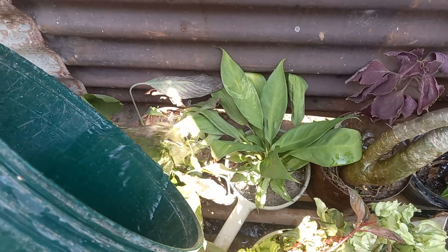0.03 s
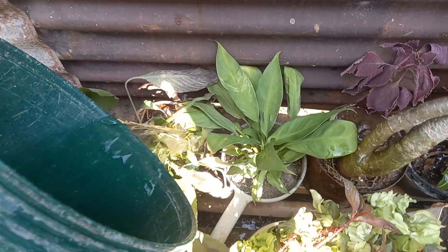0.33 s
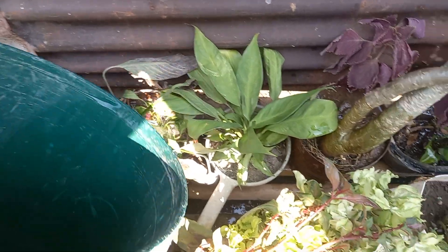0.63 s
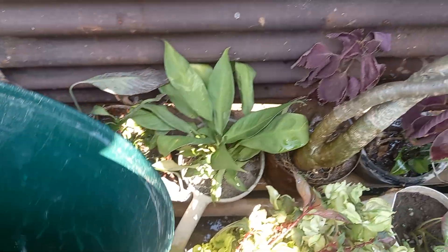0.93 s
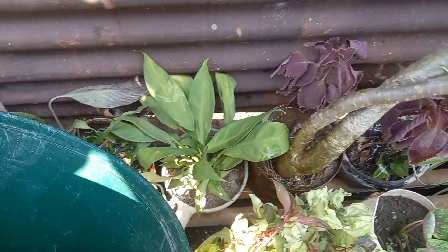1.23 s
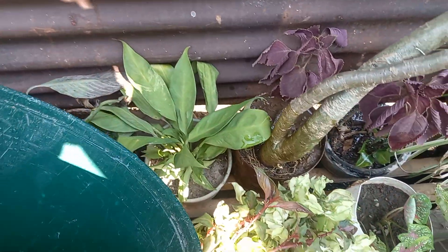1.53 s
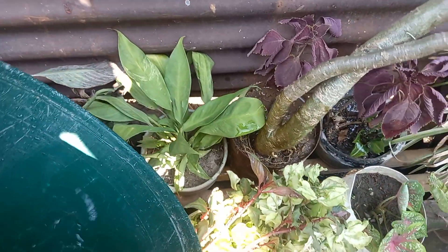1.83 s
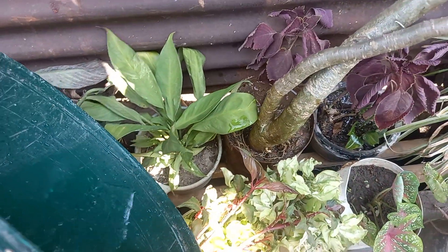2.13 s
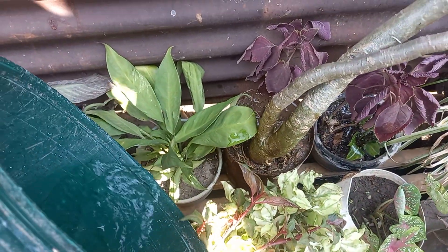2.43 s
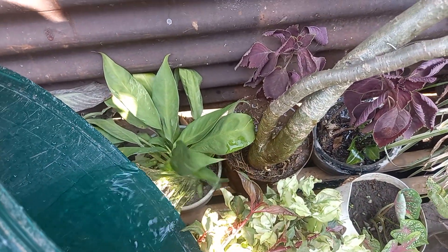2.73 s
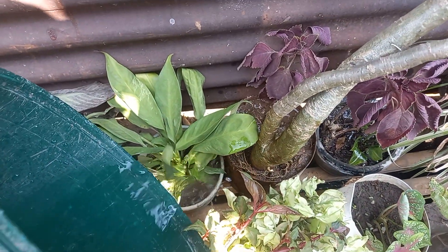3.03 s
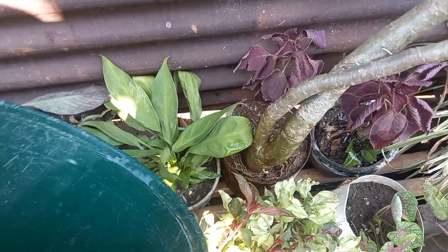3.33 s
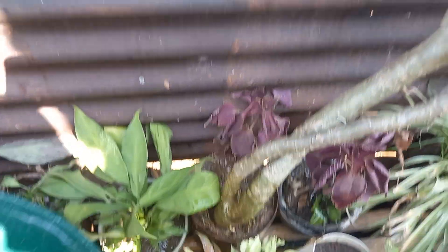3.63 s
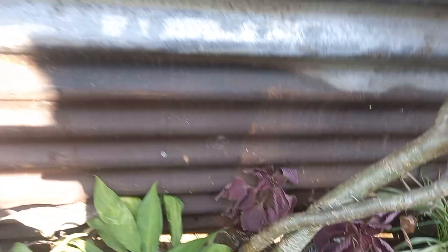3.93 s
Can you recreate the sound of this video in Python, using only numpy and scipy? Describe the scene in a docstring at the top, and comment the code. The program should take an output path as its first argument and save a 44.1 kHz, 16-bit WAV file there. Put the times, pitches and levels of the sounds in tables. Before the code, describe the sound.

Water splatters on leaves and soil in two pours, with drips in between.

```python
"""Water patters onto potted plants, tossed twice from a plastic bucket in a small yard.
Drops hit leaves and soil, bubbles ring in the pots and lumps of water slap down; between the pours
the leaves drip and softly swish close to the microphone. To the left, water shifts in the bucket
and its wall is scraped; near the end it takes a hollow knock and the handle creaks.
A faint low rumble lies under it all."""
import sys
import numpy as np
from scipy import signal
from scipy.fft import rfft, irfft
from scipy.io import wavfile

SR = 44100
rng = np.random.default_rng(int(sys.argv[2]) if len(sys.argv) > 2 else 0)


def materialize(psi):
    """Save the field psi as 16-bit PCM at rate SR to the path in sys.argv[1].

    A 1-D psi becomes a single channel; in a 2-D psi each row is a channel.
    """
    bounded = np.clip(np.atleast_2d(psi).T, -1, 1)
    quanta = np.round(bounded * 32767).astype(np.int16)
    wavfile.write(sys.argv[1], SR, quanta)


N = 176400
TIME = np.arange(N) / SR

# Water landing on the plants: first toss, run-off, second toss. Each row: time in seconds, then
# levels in dB of leaf patter, fine spray and soil splatter, before the trims in pour().
FIRST_POUR = [(0,-48,-57,-71),(.07,-48.5,-54.5,-76),(.105,-52,-49.5,-75),(.125,-46.5,-51.5,-58),(.2,-43,-48,-65.5),(.28,-49,-55,-66),(.39,-44,-46,-58),(.44,-48.5,-51,-59.5),(0.519,-40.5,-43.5,-50),(0.554,-48.5,-50.5,-61.5),(.65,-50,-55.5,-68.5),(.73,-54,-59.5,-67),(.8,-56.5,-63,-67),(.95,-59,-60.5,-75),(1.09,-60,-60,-66.5),(1.16,-71.5,-71,-88)]
RUN_OFF = [(1.25,-72,-69.5,-88),(1.4,-66.5,-67.5,-81),(1.6,-74.5,-72,-78),(1.8,-67,-70,-86.5),(1.98,-79,-77,-91),(2.08,-73,-78,-82),(2.2,-68,-74,-83),(2.38,-61.5,-62,-77.5),(2.5,-68.5,-78,-84),(2.601,-70,-74,-93)]
SECOND_POUR = [(2.659,-62,-61,-89),(2.8,-67,-60.5,-83),(2.86,-54,-55.5,-86),(2.97,-49.5,-50.5,-78),(3.05,-51,-59,-76),(3.1,-58.5,-54.5,-80.5),(3.2,-55.5,-55.5,-76),(3.32,-53.5,-57.5,-67.5),(3.39,-52,-58.5,-73.5),(3.44,-49,-61,-75),(3.47,-58.5,-59.5,-71),(3.53,-61,-64,-78),(3.7,-58.5,-66,-60),(3.76,-66,-65.5,-70.5),(3.83,-56,-79,-65),(3.89,-67,-70.5,-81),(4,-65,-73,-92)]
# Those three layers as they reach the microphone. Each row: frequency in Hz, relative level in dB.
PATTER_SPECTRUM = [(600,-29),(1250,-30),(1700,0.5),(2100,-2),(2450,1.5),(3300,2.5),(4500,2),(5700,-2.5),(7500,-32),(14000,-36)]
SPRAY_SPECTRUM = [(3000,-32.5),(5500,1),(7200,-0.5),(9200,2),(10800,-2),(12700,1.5),(15500,-4),(18000,-63)]
SPLATTER_SPECTRUM = [(40,-38),(150,-12),(330,-12.5),(530,2),(780,1),(1050,3.5),(1350,1.5),(2000,-6.5),(4000,-15)]
PATTER_TRIM_DB, SPRAY_TRIM_DB, SPLATTER_TRIM_DB, FIZZ_TRIM_DB = -1, 3, 4, -2.5
FLUTTER_DB, SPRAY_FLUTTER_DB = 1.92, 2
BUBBLES_PER_S, BUBBLE_LOW_HZ, BUBBLE_OCTAVES, BUBBLE_SPREAD_DB = 480, 1718, 2.16, 9

def pour():
    """Dense drops hit leaves and soil and bubble in the pots; patter to the right, spray to the left."""
    times, *levels_db = np.transpose(FIRST_POUR + RUN_OFF + SECOND_POUR)
    flutter_db = FLUTTER_DB * drift(70)
    on_leaves, in_air, on_soil = [from_db(np.interp(TIME, times, db) + flutter_db) for db in levels_db]
    drops = yard(impacts(per_s=7000, spread_db=3.5), wet_db=1)
    patter = from_db(PATTER_TRIM_DB) * colour(drops, PATTER_SPECTRUM)
    splatter = from_db(SPLATTER_TRIM_DB) * colour(drops, SPLATTER_SPECTRUM)
    droplets = yard(impacts(per_s=9000, spread_db=4.5), wet_db=-4)
    spray = from_db(SPRAY_TRIM_DB + SPRAY_FLUTTER_DB * drift(90)) * colour(droplets, SPRAY_SPECTRUM)
    births = [(when * N / SR, BUBBLE_LOW_HZ * 2 ** (BUBBLE_OCTAVES * pitch), BUBBLE_SPREAD_DB * size ** 2)
              for when, pitch, size in rng.random((int(BUBBLES_PER_S * N / SR), 3))]
    bubbling = yard(from_left(bubbles(births, cycles=36)), wet_db=-5)
    fizz = from_db(FIZZ_TRIM_DB) * rms_one(bubbling)
    return on_leaves * (patter + fizz) * pan(-5) + in_air * spray * pan(7) + on_soil * splatter


# Lumps of water on the nearest leaves, with little of the yard's echo.
# Each row: start in seconds, level in dB, decay time in seconds, left over right in dB.
SLAP_HITS = [(0.112,-38,0.21,4),(0.181,-41,0.044,9),(0.36,-33,0.038,11),(.384,-34.5,0.053,2),(.396,-37,0.049,-2),(0.447,-30,0.046,1),(.487,-36,.04,0),(0.492,-27.5,0.07,-0.5),(.513,-38,.04,-1),(.524,-38,.035,0),(.85,-54,0.025,-7),(0.934,-50,0.049,2),(0.982,-44,0.04,10),(0.9885,-40,.022,-2),(1.007,-40.5,0.023,15),(1.286,-55.5,0.12,-5),(2.283,-46.5,0.094,-1),(2.33,-45,0.091,-10),(2.681,-46,0.04,-4),(2.715,-52,0.037,-4),(2.978,-37,0.032,2),(3.041,-41.5,0.074,12),(3.054,-36.5,0.032,1),(3.407,-47,0.1,0),(3.42,-48,0.063,4),(3.443,-47,0.034,-3.5)]
# Their bright splash. Each row: frequency in Hz, relative level in dB.
SLAP_SPECTRUM = [(40,-55),(150,-44),(500,-5.5),(1200,-3.5),(2000,7),(3400,8),(6000,5.5),(10000,0),(13000,5.5),(16000,-6)]

def slaps():
    """A lump of water bursts on a leaf into a short shower of impacts."""
    envelope = sum(from_db(db) * pan(side) * strike(s, t60, attack_s=0.001)
                   for s, db, t60, side in SLAP_HITS)
    shower = colour(impacts(per_s=20000, spread_db=2.5), SLAP_SPECTRUM)
    return yard(envelope * shower, wet_db=-18.5)


# Single drops on leaves close to the microphone, mostly on its left.
# Each row: start in seconds, level in dB, left over right in dB, pitch of the leaf in Hz.
LEAF_TICKS = [(.008,-32.5,11,12400),(.1795,-36,2,3170),(0.3164,-44,11,3070),(.335,-26.5,6,6300),(.817,-37.5,3,6500),(.981,-34.5,2,4800),(1.010,-35,12,7450),(1.1651,-42,5,9500),(1.287,-43.5,6,6200),(1.32,-43,2,8800),(1.8943,-49,5,12100),(2.101,-45,7,7440),(2.2167,-45.5,14,9000),(2.3301,-32,10,12700),(2.3351,-34,5,12800),(2.3455,-41,0,4500),(2.571,-48,7,9600),(2.578,-48,4,11900),(2.624,-49,6,11900),(2.684,-40.5,14,8500),(2.687,-42,17,8650),(2.7128,-36,8,12500),(2.717,-41,8,11000),(2.981,-51,8,12000),(3.355,-41,8,4500),(3.436,-42,-4,3670),(3.644,-42,9,13000),(3.656,-37.5,11,12400)]
# A sharp snap, heard in the handle too. Each row: frequency in Hz, relative level in dB.
SNAP_SPECTRUM = [(500,-21),(2000,-24),(5000,2.5),(8000,1),(11000,1.5),(13500,-1),(16000,-13)]
# Larger bubbles among the pots. Each row: start in seconds, pitch in Hz, level in dB.
PLOPS = [(.09,3120,-38),(.12,1860,-43),(.364,2240,-32.5),(.396,3730,-26),(.403,3120,-31),(.85,2290,-38),(.99,2200,-33),(.997,1730,-37),(1.022,1920,-34),(1.032,1300,-44),(1.04,808,-43.5),(1.052,2760,-38.5),(1.215,2700,-56),(1.716,2600,-49),(2.86,1750,-40),(2.885,1730,-48),(2.91,1695,-32.5),(2.965,1750,-44),(3.005,1850,-44),(3.13,2560,-43),(3.448,2187,-37),(3.585,1693,-38),(3.594,1670,-46),(3.684,4000,-40.5),(3.701,3070,-46),(3.754,3770,-46)]
LEAF_RING_CYCLES, SNAP_SHARE = 12.8, .55

def drips():
    """Near drops snap and briefly ring the leaf they hit; larger bubbles plop."""
    noise = rng.standard_normal((2, N))
    snap = SNAP_SHARE * colour(noise, SNAP_SPECTRUM)
    ticks = 0
    for s, db, side, hz in LEAF_TICKS:
        leaf = rms_one(ring(noise, [(hz, 0, LEAF_RING_CYCLES / hz)]))
        ticks += from_db(db) * pan(side) * strike(s, t60=0.0076, attack_s=0.00027) * (leaf + snap)
    plops = from_left(bubbles(PLOPS, cycles=53))
    return yard(ticks, wet_db=-4.5) + yard(plops, wet_db=0.5)


# Knocks on the bucket, left of the microphone.
# Each row: start in seconds, strength of the push in dB, contact time in seconds.
KNOCKS = [(3.6575,-43,0.00079),(3.6654,-40,0.00091),(3.701,-52,0.00078),(3.724,-60,.0003)]
# Bumps and scrapes on its wall. Each row: start in seconds, length in seconds, level in dB.
SCRAPES = [(.988,.008,-42),(1.021,0.0085,-40),(1.03,.009,-44.5),(1.039,0.0084,-46),(1.051,0.006,-46),(3.414,0.035,-62),(3.582,0.025,-53),(3.841,.0074,-59),(3.864,.005,-63)]
# Its hollow body and plastic wall. Each row: frequency in Hz, gain in dB, decay time in seconds.
BODY_MODES = [(156,-15,0.22),(242,-11,0.13),(258.5,3,0.076),(345,-4.5,0.06),(410,-6,0.052),(428,-2,0.063),(496,1.5,0.13),(521,-9,0.16),(634,-13,0.12),(775,-11,0.2),(845,-7,.15),(1270,4,0.16)]
WALL_MODES = [(660,-10,0.12),(808,-6,0.025),(1053,2.5,0.055),(1260,-11,0.057),(1310,13,0.029),(1503,4,0.068),(1734,1,0.052),(1940,2,0.011),(2060,2,0.035),(2490,-15.5,0.015),(2600,-16,0.016),(3695,6,0.02)]

def bucket():
    """A knock and its bounces ring the hollow body; scraping rings the wall."""
    push = sum(from_db(db) * np.diff(np.clip((TIME - s) / contact, 0, 1), prepend=0)
               for s, db, contact in KNOCKS)
    knock = from_left(ring(push, BODY_MODES)) * pan(2.6)
    rub = sum(from_db(db) * swell(s, length) for s, length, db in SCRAPES)
    slips = impacts(per_s=2000, spread_db=0.5)[0]
    scrape = ring(rub * slips, WALL_MODES) / np.std(ring(slips, WALL_MODES))
    return yard(knock, wet_db=-18) + yard(from_left(scrape), wet_db=0)


# The handle, mostly right of the microphone. Each row: start in seconds, level in dB,
# decay time in seconds, left over right in dB, share of sharp snap from 0 to 1.
CREAKS = [(3.771,-48,0.024,-13,0),(3.7796,-40,0.038,7,1),(3.7955,-35.5,0.026,-20,0.18),(3.8055,-42,0.025,-5,0.3),(3.822,-58,0.072,-15,.05),(3.915,-38.5,0.034,-4,0.12),(3.92,-40,0.03,-6,0),(3.927,-49.5,0.17,-10,0)]
# Its narrow rasp. Each row: frequency in Hz, relative level in dB.
RASP_SPECTRUM = [(1000,-63),(2400,-13),(3150,2.5),(4200,5),(5100,1),(5900,-25),(10000,-49)]

def handle():
    """The handle slips in its sockets in short rasping bursts."""
    slips = impacts(per_s=5900, spread_db=3.5)
    rasp, snap = colour(slips, RASP_SPECTRUM), colour(slips, SNAP_SPECTRUM)
    creaks = sum(from_db(db) * pan(side) * strike(s, t60, attack_s=0.00065) * (rasp + share * snap)
                 for s, db, t60, side, share in CREAKS)
    return yard(creaks, wet_db=-6.5)


# A pot under the second toss. Each row: frequency in Hz, gain in dB, decay time in seconds.
POT_MODES = [(1794,-22,0.052),(3740,-1,0.011),(5470,-6,0.0091)]

def pot():
    """The stream drums into a pot and rings its hollow."""
    drumming = rms_one(ring(impacts(per_s=2500, spread_db=7.0), POT_MODES))
    return from_db(-56) * swell(start_s=2.72, length_s=0.49) * drumming


# Soft swishes near the microphone, mostly between the tosses.
# Each row: start in seconds, length in seconds, level in dB, centre in Hz, width in octaves.
SWISHES = [(1.3,0.22,-59.5,5400,0.65),(1.3,0.15,-62.5,8900,0.18),(1.29,0.37,-71,2800,0.57),(1.568,0.085,-61,3840,1),(1.62,0.22,-63.5,13200,0.24),(1.97,0.17,-74,6800,0.36),(2.226,0.29,-67.5,2340,0.078),(2.438,0.093,-63,10700,0.63),(2.63,0.093,-59.5,3660,0.38),(3.5,0.057,-53,4700,0.5),(2.745,0.054,-55.5,5700,0.56),(2.825,0.08,-51,4600,0.56),(1.71,0.026,-59.5,2970,0.42),(1.2,0.013,-64,5300,0.35),(0.09,0.054,-44.5,3500,0.66)]

def swishes():
    """Water slides over leaves and plastic with a faint grainy hiss."""
    out = 0
    for s, length, db, hz, octaves in SWISHES:
        half_band = 2 ** (octaves / 2)
        edges_hz = np.minimum([hz / half_band, hz * half_band], [SR / 2 - 2000, SR / 2 - 1000])
        band = signal.butter(2, edges_hz, "band", fs=SR, output="sos")
        hiss = signal.sosfilt(band, impacts(per_s=4000, spread_db=-1.0))
        out += from_db(db) * swell(s, length) * rms_one(hiss)
    return out


def slide(start_s=2.48, length_s=0.28, from_hz=4000, to_hz=6900, width_hz=1500):
    """A narrow hiss glides upward as the water runs to the lip of the bucket."""
    centre_hz = np.interp(TIME, [start_s, start_s + length_s], [from_hz, to_hz])
    lowpass = signal.butter(2, width_hz / 2, fs=SR, output="sos")
    grain = signal.sosfilt(lowpass, rng.standard_normal((2, N)))
    hiss = rms_one(grain * np.sin(2 * np.pi * np.cumsum(centre_hz) / SR))
    return from_db(-64) * swell(start_s, length_s) * hiss


# Water inside the bucket, off to the left. Each row: start in seconds, length in seconds, level in dB.
SLOSHES = [(0.875,0.071,-59),(0.99,0.071,-63),(1.365,0.15,-67),(1.566,0.08,-64.5),(2.792,0.14,-69.5),(3.228,0.14,-65.5)]
# Its dull tone. Each row: frequency in Hz, relative level in dB.
SLOSH_SPECTRUM = [(60,-13),(130,-0.5),(190,-6),(255,0),(305,-2),(370,-24),(480,-14),(700,-24),(3000,-60)]

def sloshes():
    """Water shifts in the bucket in low swells."""
    envelope = sum(from_db(db) * swell(s, length) for s, length, db in SLOSHES)
    return from_left(envelope * colour(rng.standard_normal(N), SLOSH_SPECTRUM))


# The yard's background, all around the microphone. Each row: frequency in Hz, relative level in dB.
RUMBLE_SPECTRUM = [(15,-51),(25,-28),(40,-15),(62,1.5),(80,-3),(120,-3.5),(190,-13.5),(290,-14.5),(450,-21),(800,-26.5),(2000,-42.5),(9000,-33),(16000,-55)]

def rumble():
    """A faint, steady outdoor rumble, nearly alike on both sides."""
    air = rng.standard_normal(N) + 0.63 * rng.standard_normal((2, N))
    return from_db(-66.5) * colour(air, RUMBLE_SPECTRUM)


YARD_T60_S, SIDE_LAG_S = 0.09, .00032

def yard(x, wet_db):
    """Short scattered echoes come back from the fence, pots and ground."""
    t = TIME[:SR // 3]
    tail = rng.standard_normal((2, len(t))) * np.exp(-np.log(1000) * t / YARD_T60_S) * (t > .002)
    tail *= from_db(wet_db) / np.sqrt(np.sum(tail ** 2, axis=1, keepdims=True))
    return x + signal.fftconvolve(x, tail, axes=1)[:, :N]


def from_left(x):
    """Sound from the left reaches the right side of the microphone later."""
    return np.array([x, np.interp(TIME - SIDE_LAG_S, TIME, x)])


def bubbles(rows, cycles, rise=0.028, attack_s=0.00069):
    """Each bubble (seconds, Hz, dB) dies away over the given cycles, rising slightly in pitch."""
    out = np.zeros(N + SR)
    for s, hz, db in rows:
        life = cycles / hz
        t, start = TIME[:int(life * SR)], int(s * SR)
        tone = np.sin(2 * np.pi * hz * t * (1 + rise * t / life))
        envelope = np.exp(-np.log(1000) * t / life) * (1 - np.exp(-t / attack_s))
        out[start:start + len(t)] += from_db(db) * tone * envelope
    return out[:N]


def impacts(per_s, spread_db):
    """Random tiny impacts, each with its own size and direction; stereo, rms 1."""
    when, weight, polarity, bearing, balance = rng.random((int(per_s * N / SR), 5)).T
    size = from_db(spread_db * np.minimum(-np.log(1 - weight), 3.5)) * np.sign(polarity - .5)
    at, lag = when * N, SIDE_LAG_S * SR * (4 * bearing - 1)
    angle = np.pi / 2 * (.2 + .6 * balance)
    left = np.bincount(at.astype(int) % N, size * np.cos(angle), N)
    right = np.bincount((at + lag).astype(int) % N, size * np.sin(angle), N)
    return rms_one(np.array([left, right]))


def ring(x, modes):
    """Drive a set of decaying modes; none passes the deep bass."""
    drive = x + 1e-15 * (-1.) ** (np.arange(N) // 2)  # inaudible; keeps the tails from underflowing
    out = 0
    for hz, db, t60 in modes:
        r, w = np.exp(-np.log(1000) / (t60 * SR)), 2 * np.pi * hz / SR
        out += from_db(db) * signal.lfilter([.5, 0, -.5], [1, -2 * r * np.cos(w), r * r], drive)
    return out


def colour(x, spectrum):
    """Give a steady sound a spectrum; rms 1."""
    hz, db = np.transpose(spectrum)
    bin_hz = np.maximum(np.arange(N // 2 + 1) * SR / N, 1)
    gain = from_db(np.interp(np.log(bin_hz), np.log(hz), db))
    return rms_one(irfft(rfft(x) * gain, N))


def strike(start_s, t60, attack_s):
    """Envelope of a quick rise and an exponential fall, 60 dB in t60 seconds."""
    out, span = np.zeros(N), (TIME > start_s) & (TIME < start_s + 2 * t60)
    age = TIME[span] - start_s
    out[span] = (1 - np.exp(-age / attack_s)) * np.exp(-np.log(1000) * age / t60)
    return out


def swell(start_s, length_s):
    """Envelope of a stroke that rises early and eases off."""
    progress = np.clip((TIME - start_s) / length_s, 0, 1)
    return np.sqrt(np.abs(np.sin(np.pi * progress ** 0.64)))


def drift(per_s):
    """Random wander with a spread near 1."""
    count = int(N / SR * per_s) + 3
    return np.interp(TIME * per_s, np.arange(count), rng.standard_normal(count))


def pan(db):
    """Left and right gains for a level difference; positive is left."""
    return rms_one(from_db([[db / 2], [-db / 2]]))


def from_db(db):
    """Decibels to gain."""
    return 10 ** (np.asarray(db) / 20)


def rms_one(x):
    """Scale to an rms of 1."""
    return x / np.sqrt(np.mean(x ** 2) + 1e-20)


def scene():
    """Water, bucket and background, heard from one spot in the yard."""
    water = pour() + pot() + slaps() + drips() + swishes() + slide() + sloshes()
    return water + bucket() + handle() + rumble()


def record(dry, cutoff_hz=16300):
    """The microphone signal loses its highest treble in a steep cut."""
    return signal.sosfilt(signal.ellip(10, .3, 75, cutoff_hz, fs=SR, output="sos"), dry)


dry = scene()
out = record(dry)
materialize(out)
```